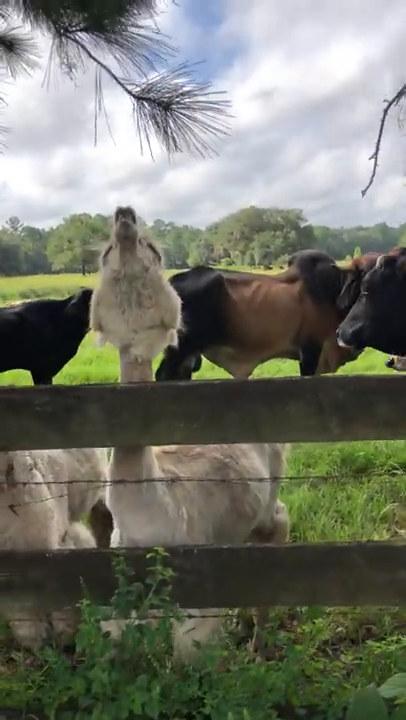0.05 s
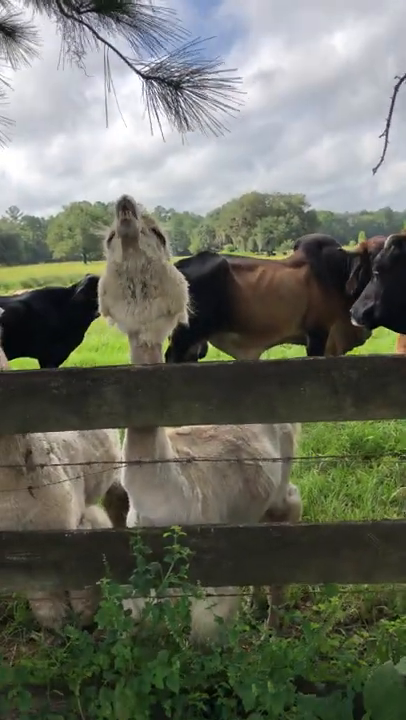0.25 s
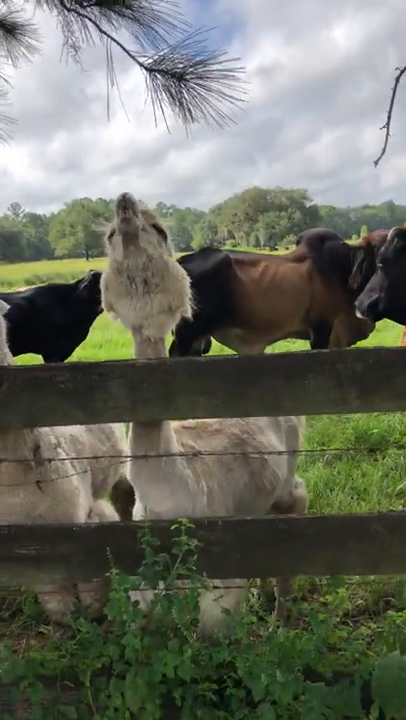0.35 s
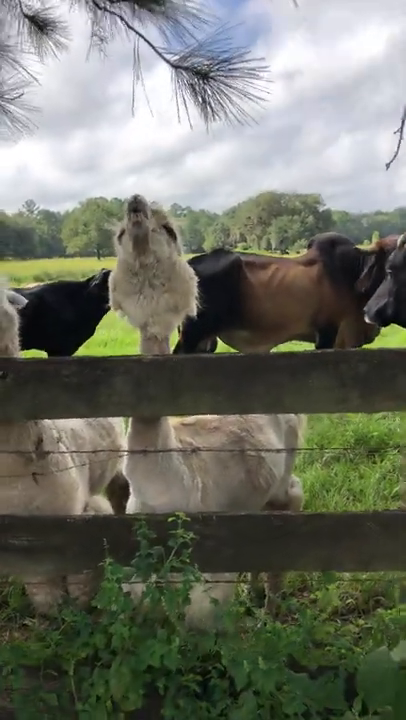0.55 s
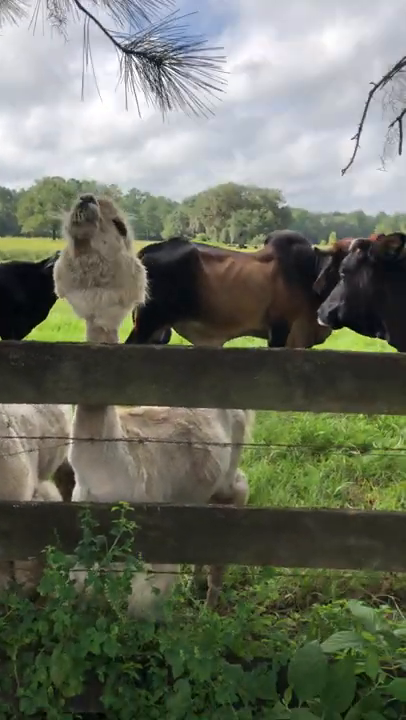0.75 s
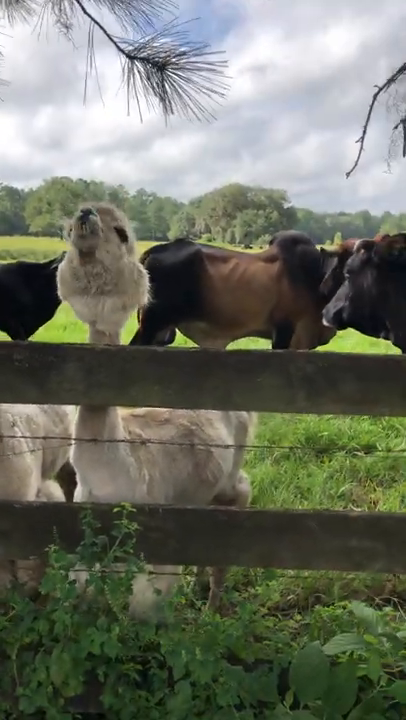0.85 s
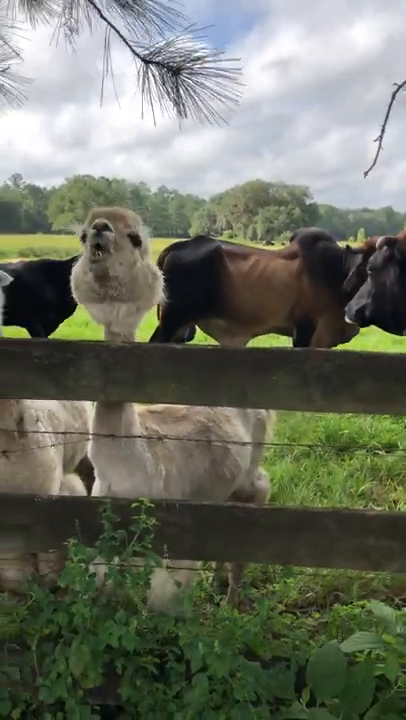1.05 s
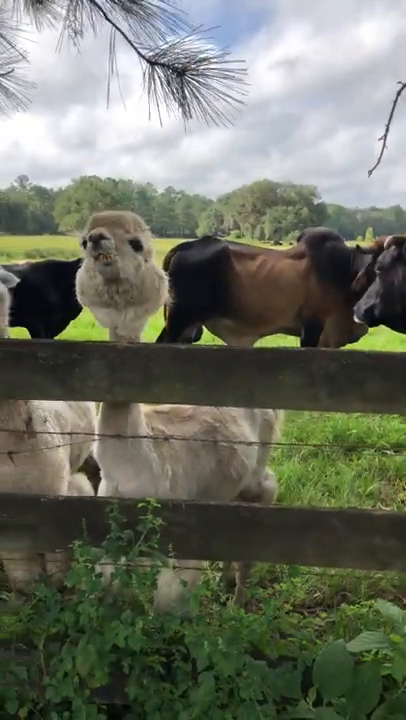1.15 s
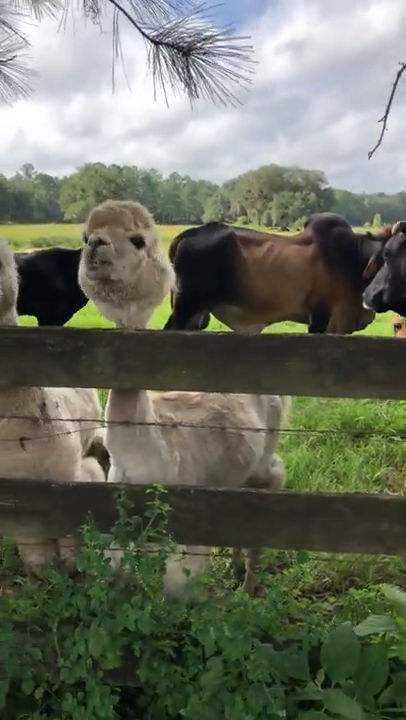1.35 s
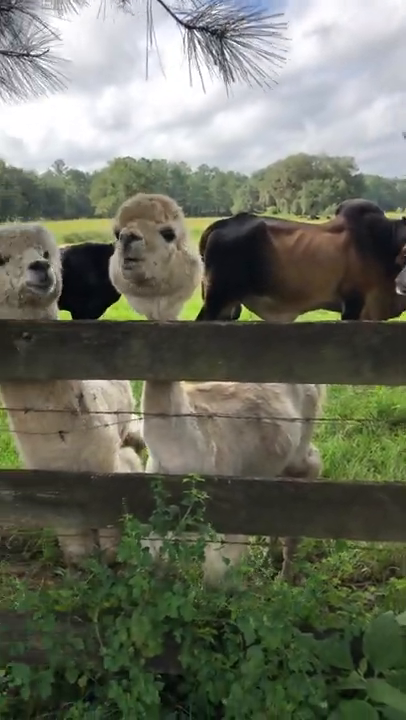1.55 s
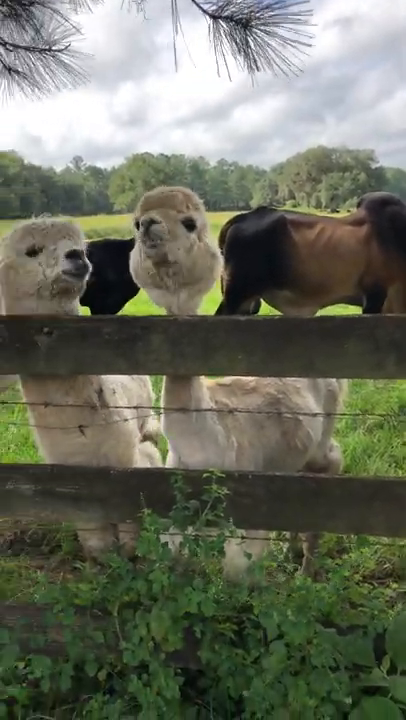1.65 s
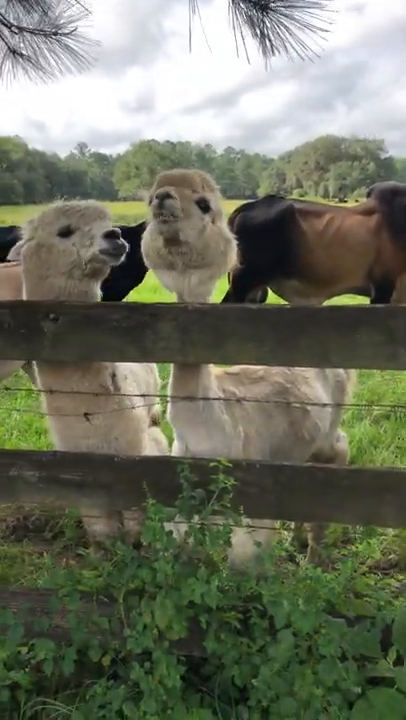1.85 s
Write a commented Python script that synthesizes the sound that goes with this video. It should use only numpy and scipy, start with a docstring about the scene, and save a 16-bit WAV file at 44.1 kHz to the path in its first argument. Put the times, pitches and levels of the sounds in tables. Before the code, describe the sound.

An alpaca's nasal hum opens into a buzzing, moo-like call, with light wind.

```python
"""An animal moos at a pasture fence, over faint hiss, far insects and wind on a hand-held microphone.
First a thin, airy nasal hum climbs in pitch, with a scuff and a tick beside it.
At 0.74 s the mouth opens and the larynx pulses ring the throat in a steady buzzing call,
while gusts and soft thumps build. From about 1.55 s the call sags into separate pulses and ends."""
import sys
import numpy as np
from scipy.fft import rfft, irfft, next_fast_len
from scipy.io import wavfile
from scipy.ndimage import uniform_filter1d, map_coordinates

SR = 44100
rng = np.random.default_rng(int(sys.argv[2]) if len(sys.argv) > 2 else 0)


def wav_out(sig):
    """Save sig, one row per channel (or a flat mono array), as 16-bit PCM at SR to the path in sys.argv[1]."""
    wavfile.write(sys.argv[1], SR, np.round(np.clip(np.atleast_2d(sig).T, -1, 1) * 32767).astype(np.int16))


N = 83790
TIME_S = np.arange(N) / SR


def amp(db):
    """Decibels to gain."""
    return 10 ** (np.asarray(db) / 20)


def unit(x):
    """Scale to rms 1."""
    return x / np.sqrt(np.mean(x ** 2) + 1e-20)


def curve(rows):
    """Straight lines through (time [s], value) points."""
    return np.interp(TIME_S, *np.transpose(rows))


def ramp(start_s, end_s):
    """Linear rise from 0 to 1."""
    return np.clip((TIME_S - start_s) / (end_s - start_s), 0, 1)


def bell(at_s, half_width_s):
    """Gaussian envelope, peak 1."""
    return np.exp(-((TIME_S - at_s) / half_width_s) ** 2)


def wobble(rate_hz):
    """Smooth curve through random knots."""
    knots = rng.standard_normal(int(N * rate_hz / SR) + 4)
    return map_coordinates(knots, [TIME_S * rate_hz])


def filtered(x, response):
    """Apply a complex frequency response."""
    size = 2 * next_fast_len(N)
    return irfft(rfft(x, size) * response(np.fft.rfftfreq(size, 1 / SR)), size)[:N]


def colour(points, hz):
    """Minimum-phase response through (frequency [Hz], gain [dB]) points."""
    point_hz, db = np.transpose(points)
    gain = amp(np.interp(np.log(hz + 1), np.log(point_hz + 1), db))
    cepstrum = irfft(np.log(gain))
    cepstrum[1:len(cepstrum) // 2] *= 2
    cepstrum[len(cepstrum) // 2 + 1:] = 0
    return np.exp(rfft(cepstrum))


def resonance(hz, centre_hz, width_hz):
    """Two-pole band-pass response."""
    return 1j * hz * width_hz / (centre_hz ** 2 - hz ** 2 + 1j * hz * width_hz)


def band(x, centre_hz, width_hz):
    """x through one resonance twice, rms 1."""
    return unit(filtered(x, lambda hz: resonance(hz, centre_hz, width_hz) ** 2))


def shaped(x, points):
    """x through a colour, rms 1."""
    return unit(filtered(x, lambda hz: colour(points, hz)))


def noise(points):
    """Coloured noise, rms 1."""
    return shaped(rng.standard_normal(N), points)


def pasture():
    """Still field air, a band of far insects and a drifting high hiss."""
    # air spectrum (frequency [Hz], gain [dB])
    field_colour = [(30, -1), (80, -2), (200, -7.5), (400, -11.5), (800, -12), (1300, -18.5), (1900, -23),
                    (3000, -20.5), (5000, -25.5), (7500, -24), (9000, -32.5), (12000, -51.5)]
    # hiss envelope (time [s], level [dB])
    hiss_db = [(0, -66), (.35, -67), (.55, -62.5), (.62, -63.5), (.72, -64.5), (.89, -63.5), (1.06, -67),
               (1.24, -65), (1.36, -69.5), (1.43, -67.5), (1.49, -60), (1.7, -61.5), (1.8, -65.5),
               (1.9, -63.5)]
    # hiss spectrum (frequency [Hz], gain [dB])
    hiss_colour = [(1200, -9), (2700, -9), (4000, -3), (5500, -6.5), (7500, -2), (12000, -8), (15500, -7.5)]
    insects = amp(-65) * band(rng.standard_normal(N), centre_hz=10108, width_hz=1180)
    air = amp(-59.5) * noise(field_colour)
    return air + insects + amp(curve(hiss_db)) * noise(hiss_colour)


def rustles():
    """Brief dry brushes of grass."""
    # brushes (time [s], level [dB], half-width [s])
    brushes = [(0.564, -56.5, 0.0055), (0.678, -58, 0.004), (0.9, -57.5, 0.0203), (0.982, -55.5, 0.0052),
               (1.499, -58.5, 0.0082), (1.834, -63, 0.0022)]
    # grass spectrum (frequency [Hz], gain [dB])
    grass_colour = [(500, -13.5), (1200, 5.5), (2500, -13.5), (4000, -3.5), (8000, -9), (14000, -12.5)]
    return noise(grass_colour) * sum(amp(db) * bell(at_s, half_s) for at_s, db, half_s in brushes)


def scuff():
    """Dry noise burst with a fast decay and a faint tail."""
    # burst and tail (onset [s], level [dB], t60 [s])
    decays = [(0.2246, -45.5, 0.063), (.245, -52.5, 0.44)]
    # scuff spectrum (frequency [Hz], gain [dB])
    scuff_colour = [(300, -7.5), (1000, -5), (1700, 2), (2050, 5), (2400, -2), (2850, 0), (3400, -18.5),
                    (4400, -17.5), (5000, -3.5), (5500, -25.5), (6200, -17.5), (12000, -38.5)]
    envelope = sum((TIME_S >= at_s) * amp(db - 60 * np.abs(TIME_S - at_s) / t60_s)
                   for at_s, db, t60_s in decays)
    return envelope * noise(scuff_colour)


def tick():
    """One tiny bright noise burst."""
    # tick spectrum (frequency [Hz], gain [dB])
    tick_colour = [(1000, -28.5), (8000, -14), (12000, -29.5), (14000, -4), (15400, 0)]
    return amp(-38) * bell(at_s=.3893, half_width_s=.00125) * noise(tick_colour)


def wind():
    """Gusts rumble on the microphone over a light breeze."""
    # wind spectrum (frequency [Hz], gain [dB])
    rumble_colour = [(18, -28.5), (35, -2.5), (60, 3), (100, 0), (170, -10), (260, -21.5), (420, -28),
                     (800, -42), (2000, -67)]
    # gusts (time [s], level [dB], half-width [s])
    gusts = [(0.057, -53, 0.052), (0.145, -49, 0.039), (0.247, -45, 0.0153), (.297, -43, 0.0205),
             (0.473, -43.5, 0.0384), (0.561, -39, 0.0245), (0.675, -37, 0.056), (0.723, -34.5, 0.0405),
             (0.888, -41, 0.039), (0.961, -36.5, 0.0288), (1.058, -38, 0.0826), (1.173, -31, 0.02025),
             (1.207, -36, 0.06), (1.286, -40.5, 0.0314), (1.356, -41, 0.02027), (1.448, -43.5, 0.067),
             (1.52, -42, 0.0131), (1.845, -71, 0.0405)]
    breeze_db = -59
    rumble = noise(rumble_colour)
    running_rms = np.sqrt(np.abs(uniform_filter1d(rumble ** 2, size=1800)) + 1e-6)
    gust_power = sum((amp(db) * bell(at_s, half_s)) ** 2 for at_s, db, half_s in gusts)
    return rumble / running_rms * np.sqrt(amp(breeze_db) ** 2 + gust_power)


def thumps(partials=9):
    """Soft thumps on the microphone, each a cluster of low partials; one deep bump comes last."""
    # thumps (time [s], peak [dB], centre [Hz], half-width [s])
    hits = [(0.228, -38, 220.3, 0.00307), (0.541, -41.5, 228, 0.0071), (.67, -33, 190.8, 0.00786),
            (0.723, -29, 330.9, 0.00364), (0.769, -36.5, 241.7, 0.0071), (1.049, -34.5, 169.2, 0.018),
            (1.09, -30.5, 170, 0.0131), (1.153, -30, 209.2, 0.0064), (1.171, -32, 470, 0.00359),
            (1.187, -33, 362.8, 0.0197), (1.222, -26.5, 330, 0.0044), (1.235, -24.5, 350, 0.00715)]
    bump_s, bump_db, bump_hz = 1.697, -38, 87
    log_spread = .6
    out = amp(bump_db) * bell(bump_s, .018) * np.sin(2 * np.pi * bump_hz * (TIME_S - bump_s))
    for at_s, db, centre_hz, half_s in hits:
        offsets = np.linspace(-1, 1, partials) + .06 * rng.standard_normal(partials)
        partial_hz = centre_hz * np.exp(log_spread * offsets)
        cluster = sum(np.sin(2 * np.pi * (hz * TIME_S + rng.random())) / hz for hz in partial_hz)
        thump = bell(at_s, half_s) * cluster
        out = out + amp(db) * thump / np.abs(thump).max()
    return out


def fraying(start_s=1.5405, growth_per_s=14.84):
    """Unevenness of the voice: 1 while held, rising as the call runs out."""
    return 1 + growth_per_s * np.maximum(TIME_S - start_s, 0)


def larynx(harmonics=48):
    """Slightly uneven pulses with a puff of noise in each cycle, fraying toward the end."""
    # pulse rate (time [s], pitch [Hz])
    pitch_hz = [(0, 82.12), (.24, 91.94), (.42, 99.49), (.6, 104.5), (.74, 109.4), (.81, 112.6),
                (.93, 114.1), (1.09, 116.8), (1.3, 117.9), (1.47, 116.8), (1.54, 115), (1.6, 109),
                (1.65, 101.6), (1.69, 84.97), (1.75, 62.48)]
    jitter, shimmer_db, rasp_db = .000622, .52, -27  # before fraying
    fray = fraying()
    rate_hz = curve(pitch_hz) * (1 + jitter * fray * wobble(60.62))
    phase = 2 * np.pi * np.cumsum(rate_hz) / SR
    pulses = unit(sum(np.cos(k * phase) for k in range(1, harmonics + 1)))
    puffs = unit(rng.standard_normal(N) * (1 + np.cos(phase)) ** 2)
    return pulses * amp(shimmer_db * fray * wobble(80)) + amp(rasp_db) * fray * puffs


def low_throat(pulses):
    """Lowest throat resonance: a wavering tone plus breath that grows as the call frays."""
    # resonance envelope (time [s], level [dB])
    low_db = [(.7, -95.5), (.75, -65.5), (.8, -52), (.92, -52.5), (.98, -59), (1.1, -51), (1.36, -50),
              (1.56, -52), (1.64, -54), (1.69, -50), (1.73, -59.5), (1.79, -91)]
    # resonance shape (frequency [Hz], gain [dB])
    low_colour = [(110, -17.5), (230, -22), (300, 3.5), (350, 1), (400, 1), (460, -16.5), (600, -34),
                  (1000, -53.5)]
    waver_db = 3.22
    tone = shaped(pulses, low_colour) * amp(waver_db * wobble(24.965))
    breath = amp(-11.5) * np.sqrt(fraying()) * noise(low_colour)
    return (tone + breath) * amp(curve(low_db))


def nasal_hum(pulses):
    """Pulses and air pass through the nose; the hum stops as the mouth opens."""
    # closed-mouth envelope (time [s], level [dB])
    hum_db = [(0, -71), (.07, -64.5), (.24, -60), (.54, -59), (.72, -67)]
    # nasal passage (frequency [Hz], gain [dB])
    nose_colour = [(150, -39), (550, -12), (850, -18.5), (1160, -21), (1270, -2), (1330, 2.5), (1420, -4),
                   (1560, -15), (1850, -22), (2200, -14), (2450, -27), (2760, -19), (3000, -35.5),
                   (4500, -32)]
    # nasal airflow (time [s], level [dB])
    air_db = [(0, -67), (.21, -92), (.25, -61), (.4, -59.5), (.66, -58), (.78, -67.5), (1.7, -76),
              (1.8, -68.5)]
    # airflow spectrum (frequency [Hz], gain [dB])
    air_colour = [(200, -26), (550, 3.5), (900, 0), (1300, 2.5), (1700, -3.5), (2100, -2), (2400, 1.5),
                  (2700, 4.5), (3100, -20.5), (4200, -6), (7000, -54.5)]
    sink_ratio = 1.047  # resonances drop as the neck stretches
    relaxed = shaped(pulses, nose_colour)
    stretched = unit(filtered(pulses, lambda hz: colour(nose_colour, hz * sink_ratio)))
    stretch = ramp(.267, .516)
    hum = (1 - stretch) * relaxed + stretch * stretched
    mouth_closed = 1 - ramp(.735, .74)
    return hum * mouth_closed * amp(curve(hum_db)) + noise(air_colour) * amp(curve(air_db))


def open_mouth(pulses):
    """Pulses ring the open throat; a side resonance joins as the jaw drops."""
    # open-mouth envelope (time [s], level [dB])
    call_db = [(.722, -88), (.738, -49), (.77, -43), (.86, -43), (.95, -44), (1.28, -41), (1.5, -42.5),
               (1.6, -47.5), (1.63, -45.5), (1.7, -52.5), (1.748, -66), (1.775, -80.5)]
    # throat resonances (centre [Hz], width [Hz], gain [dB])
    formants = [(1471.2, 77.4, -0.5), (1840, 102.7, -4), (2302.6, 158.6, -13), (2995, 66, -27),
                (3320, 35.5, -23), (4090, 160, -33)]
    # steep skirts around them (frequency [Hz], gain [dB])
    skirts = [(300, -52), (700, 2), (950, 14.5), (1300, 12), (1900, 5.5), (2030, 2), (2300, -0.5),
              (2600, -13), (2950, -2), (3900, -1), (4800, -15.5)]

    def throat(hz):
        """Resonances of alternating sign, shaped by the skirts."""
        peaks = sum((-1) ** k * amp(db) * resonance(hz, centre_hz, width_hz)
                    for k, (centre_hz, width_hz, db) in enumerate(formants))
        return colour(skirts, hz) * peaks

    buzz = unit(filtered(pulses, throat))
    side = amp(-17.5) * band(pulses, centre_hz=1011.8, width_hz=53)
    jaw_drop = ramp(.994, 1.11)
    return (buzz + jaw_drop * side) * amp(curve(call_db))


def moo():
    """One pulse train sounds first through the nose, then through the throat and open mouth."""
    pulses = larynx()
    return low_throat(pulses) + nasal_hum(pulses) + open_mouth(pulses)


def scene():
    """Mono sum of all sources."""
    return (moo() + wind() + thumps() + scuff() + tick() + rustles() + pasture())[None]


def record(dry):
    """Microphone: fourth-order bass cut and a hard upper band limit."""
    low_cut_hz, top_hz = 48, 15800
    return filtered(dry[0], lambda hz: (hz < top_hz) * hz ** 4 / np.sqrt(hz ** 8 + low_cut_hz ** 8))[None]


dry = scene()
out = record(dry)
wav_out(out)
```